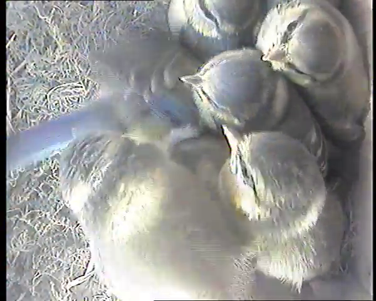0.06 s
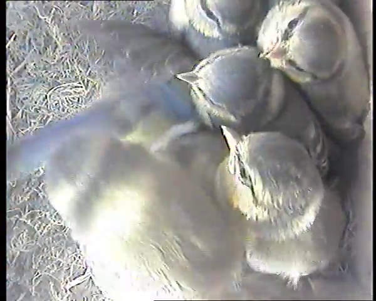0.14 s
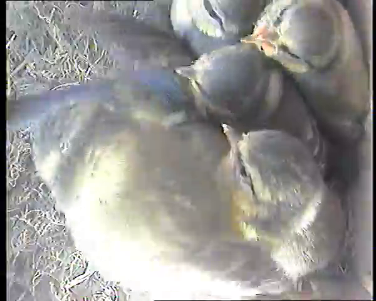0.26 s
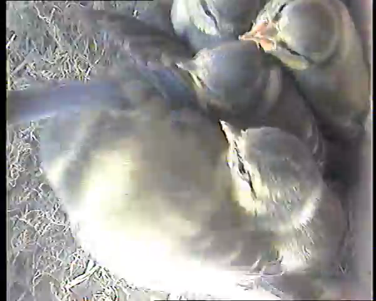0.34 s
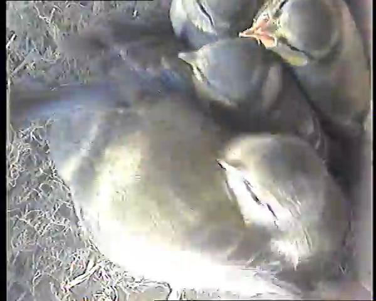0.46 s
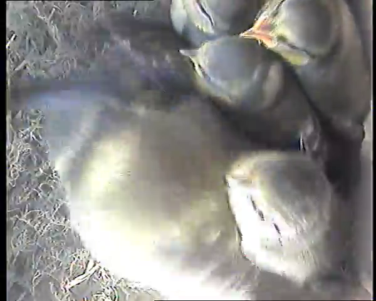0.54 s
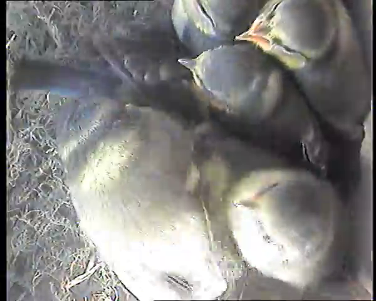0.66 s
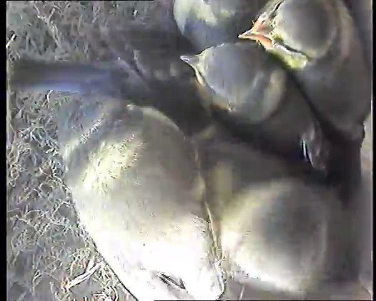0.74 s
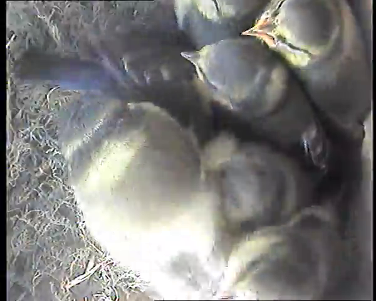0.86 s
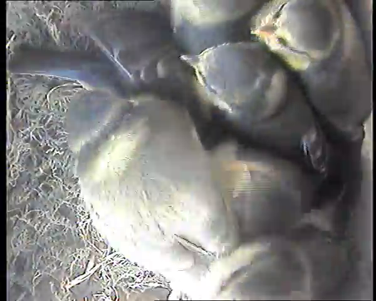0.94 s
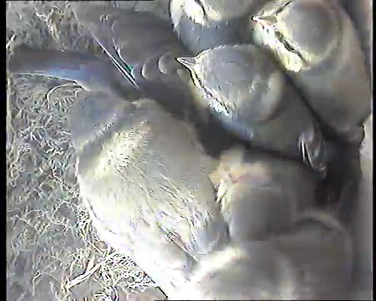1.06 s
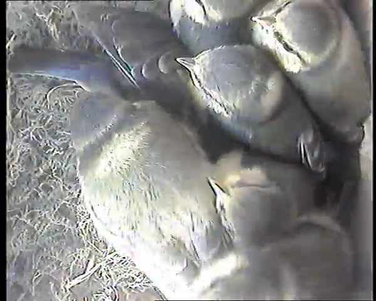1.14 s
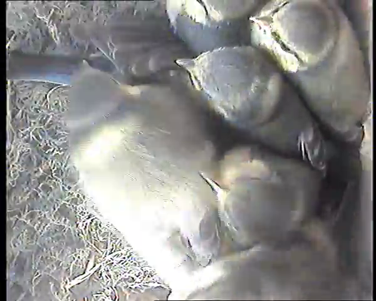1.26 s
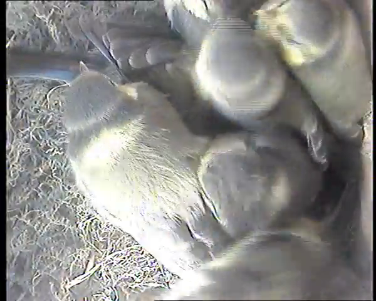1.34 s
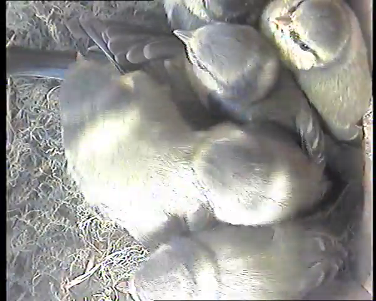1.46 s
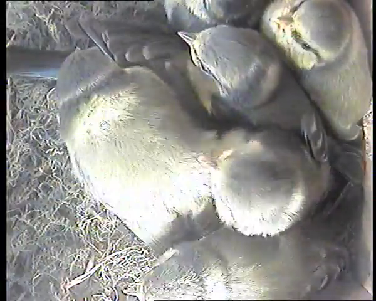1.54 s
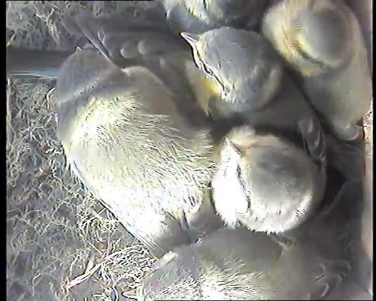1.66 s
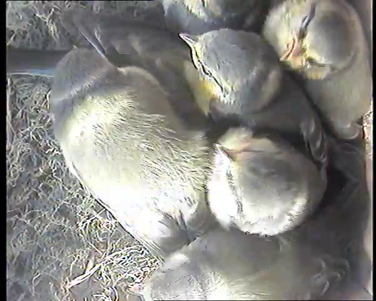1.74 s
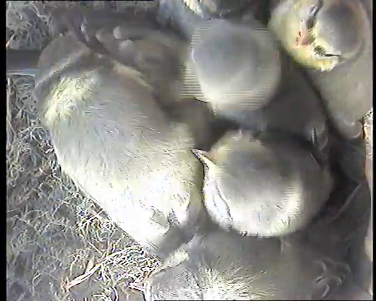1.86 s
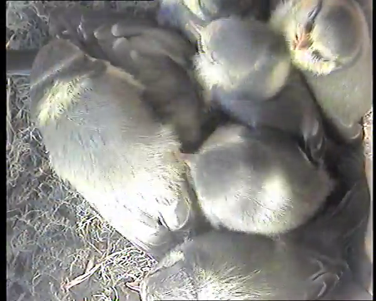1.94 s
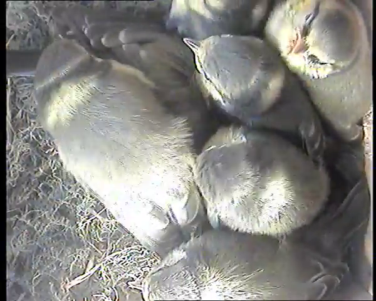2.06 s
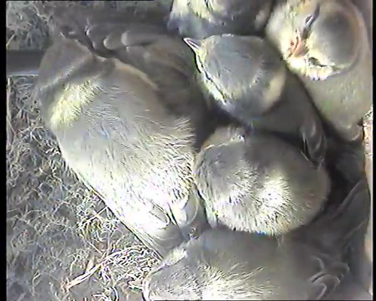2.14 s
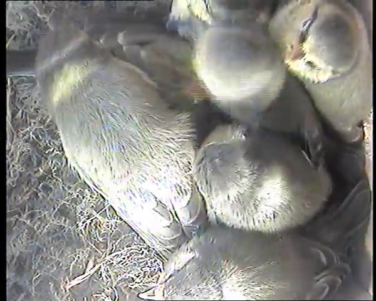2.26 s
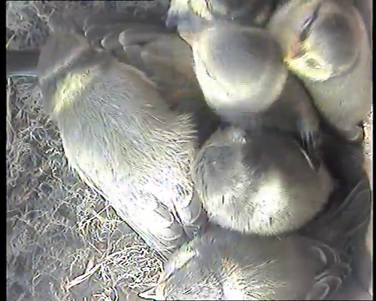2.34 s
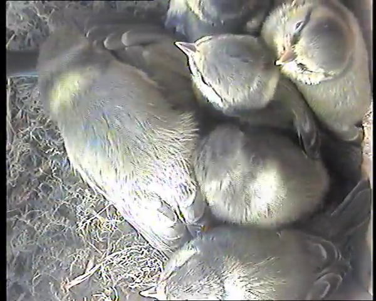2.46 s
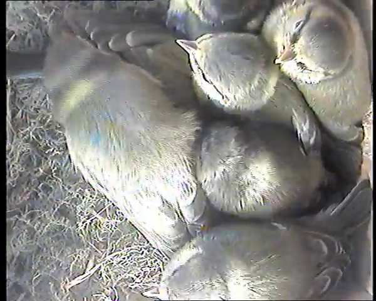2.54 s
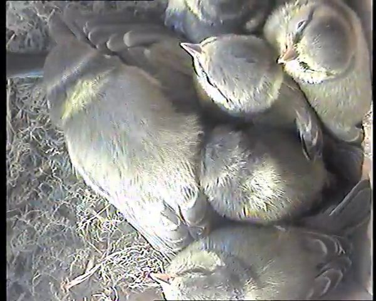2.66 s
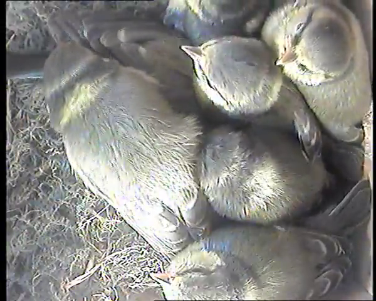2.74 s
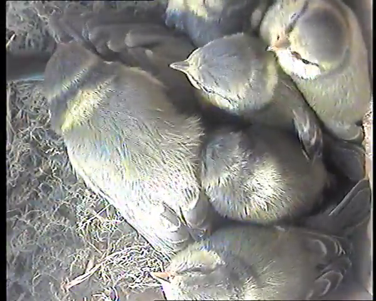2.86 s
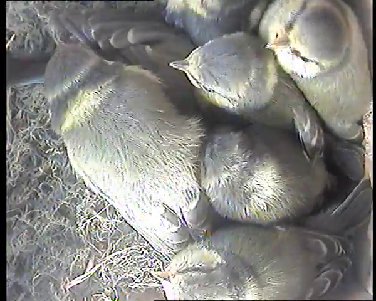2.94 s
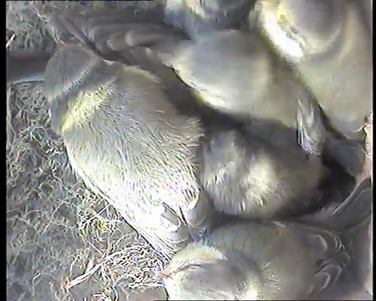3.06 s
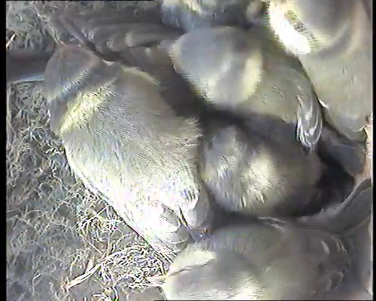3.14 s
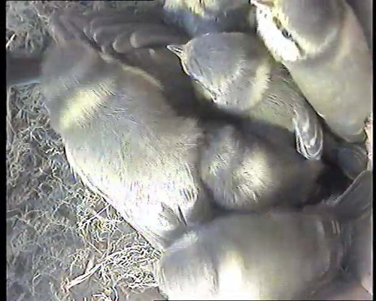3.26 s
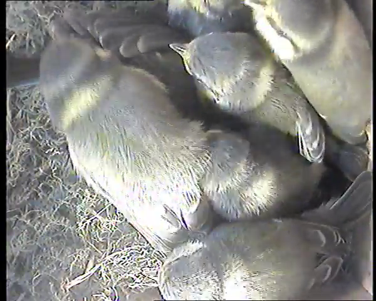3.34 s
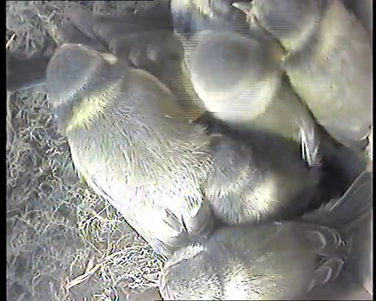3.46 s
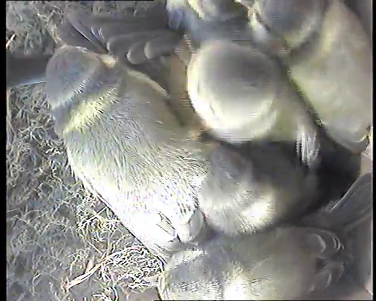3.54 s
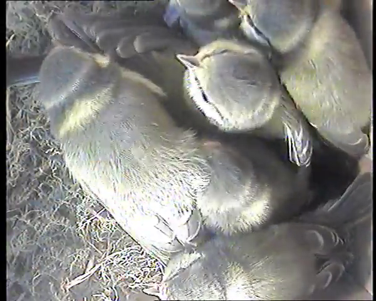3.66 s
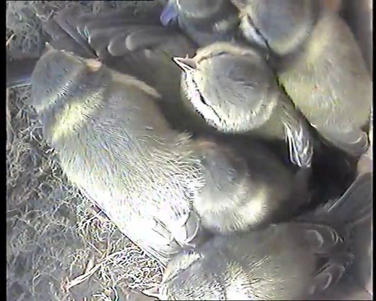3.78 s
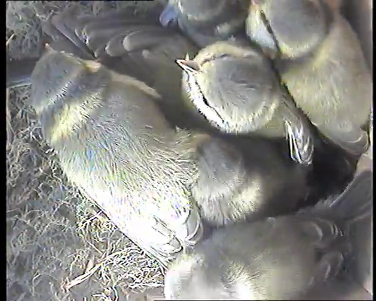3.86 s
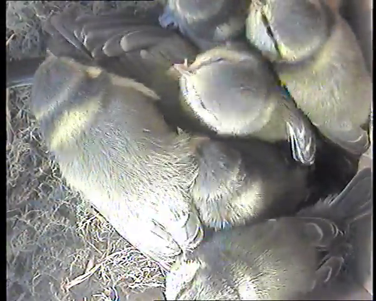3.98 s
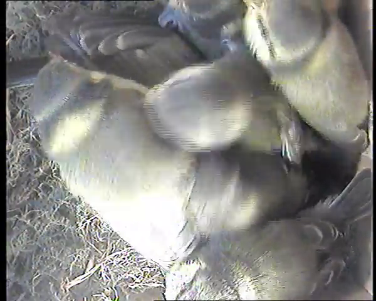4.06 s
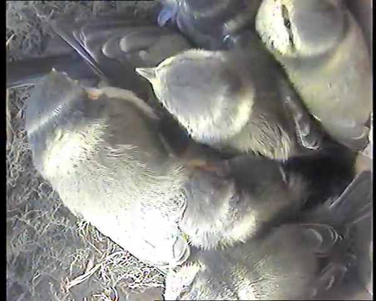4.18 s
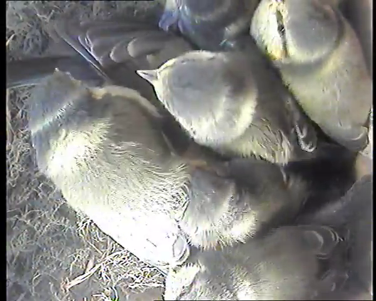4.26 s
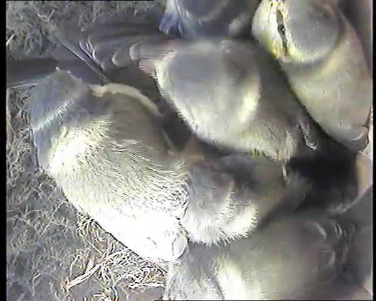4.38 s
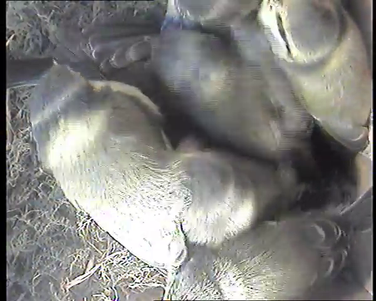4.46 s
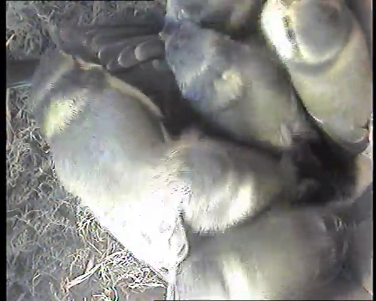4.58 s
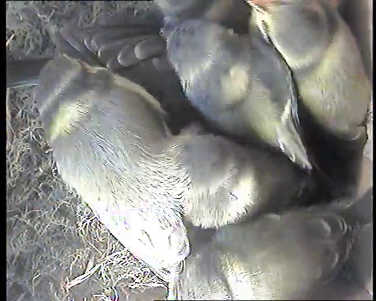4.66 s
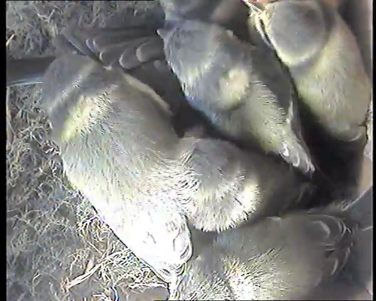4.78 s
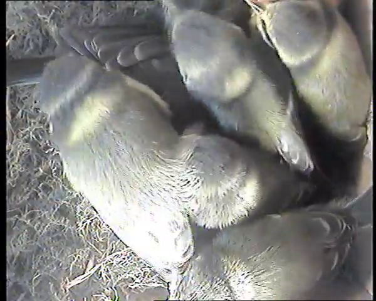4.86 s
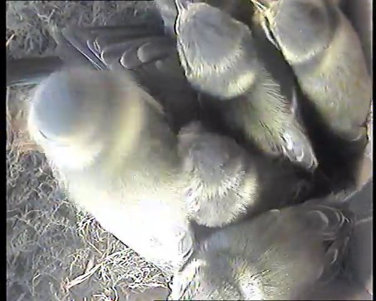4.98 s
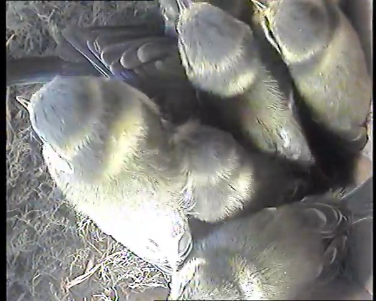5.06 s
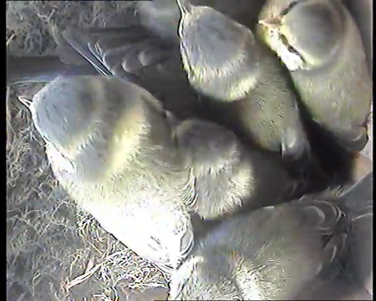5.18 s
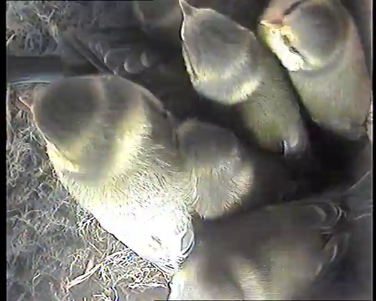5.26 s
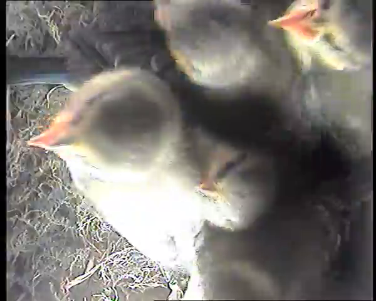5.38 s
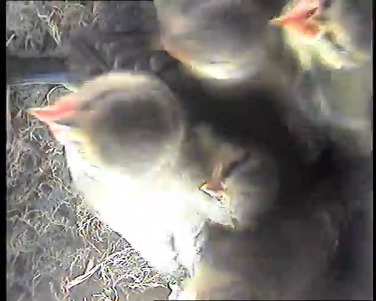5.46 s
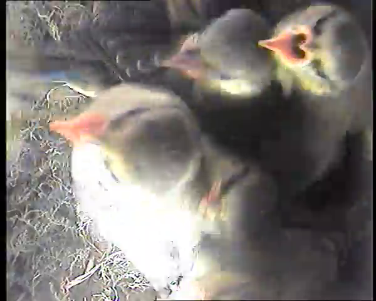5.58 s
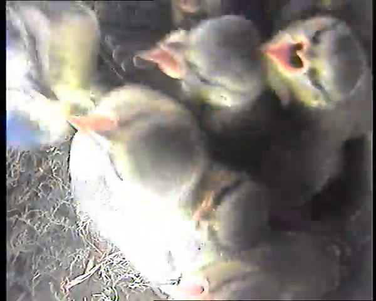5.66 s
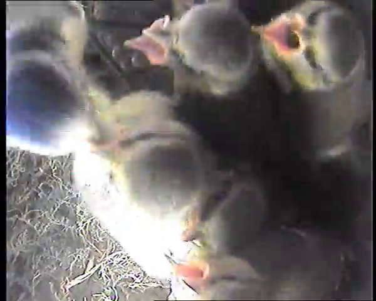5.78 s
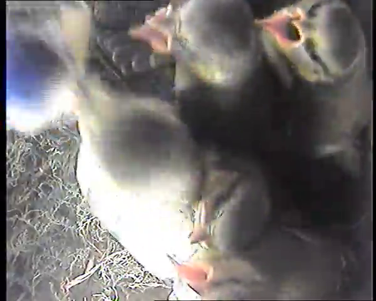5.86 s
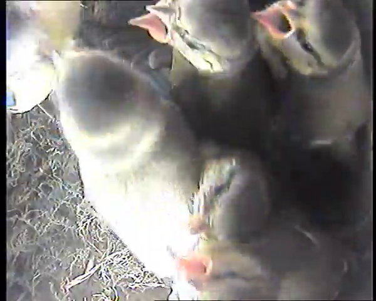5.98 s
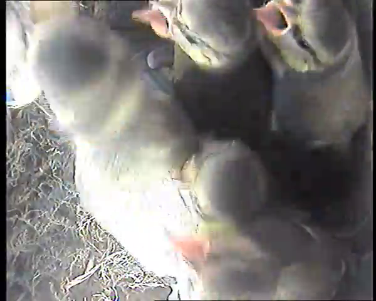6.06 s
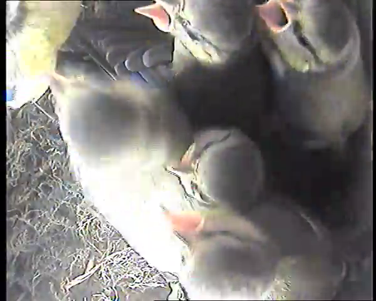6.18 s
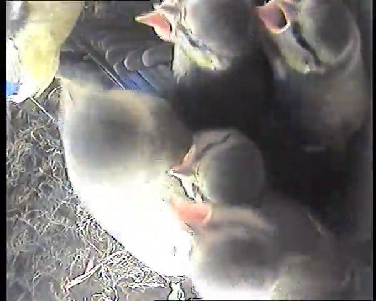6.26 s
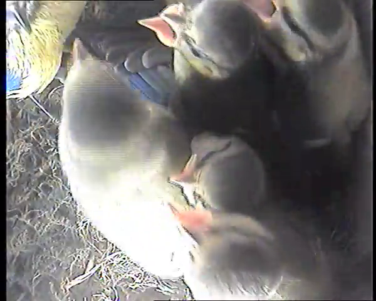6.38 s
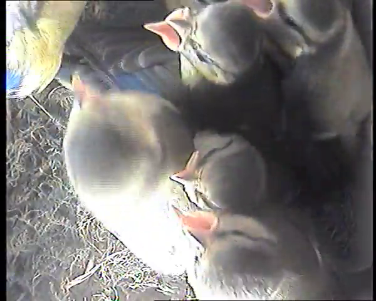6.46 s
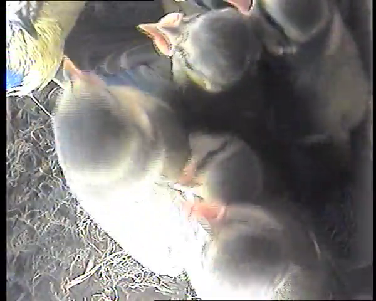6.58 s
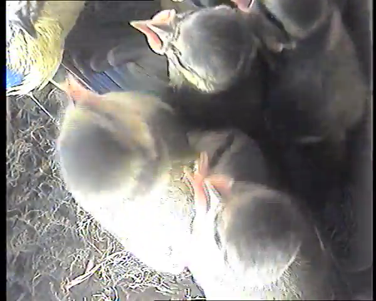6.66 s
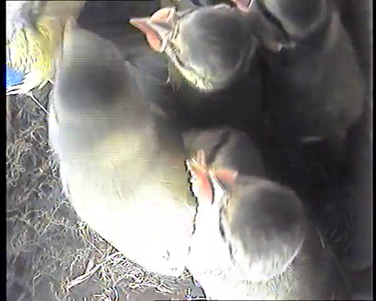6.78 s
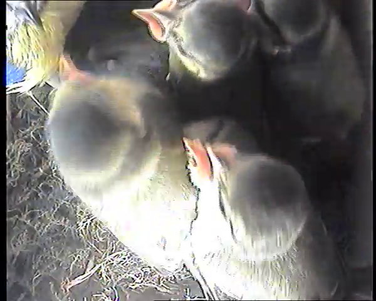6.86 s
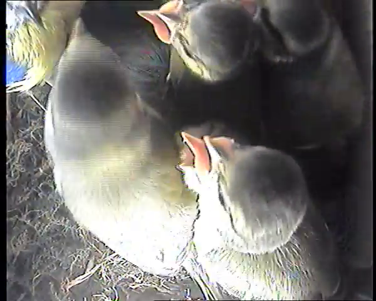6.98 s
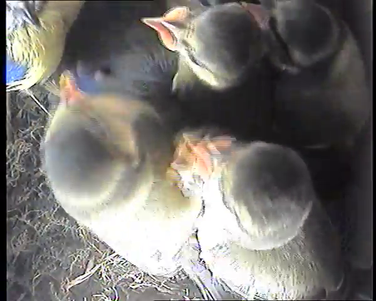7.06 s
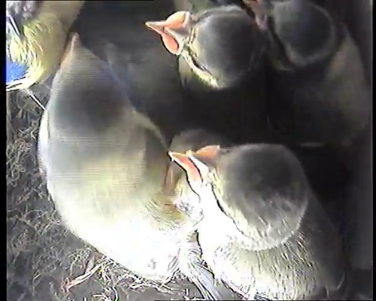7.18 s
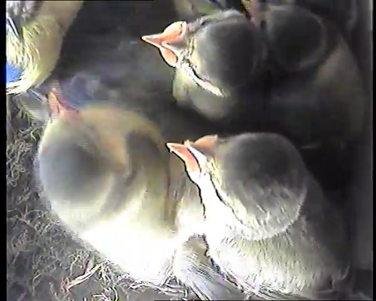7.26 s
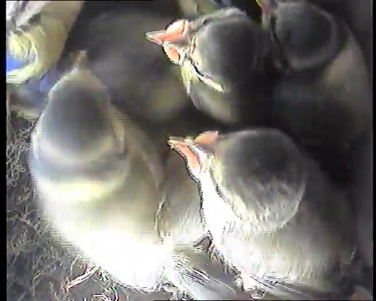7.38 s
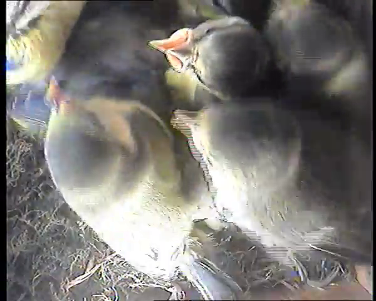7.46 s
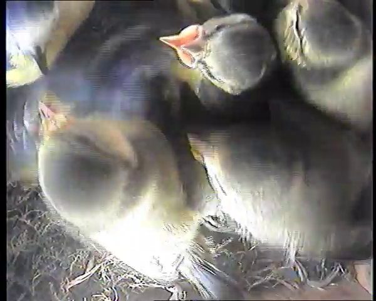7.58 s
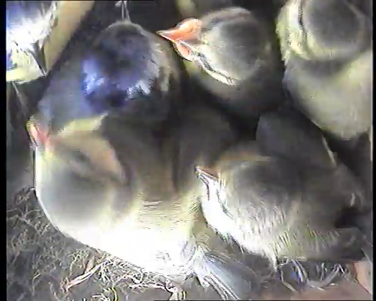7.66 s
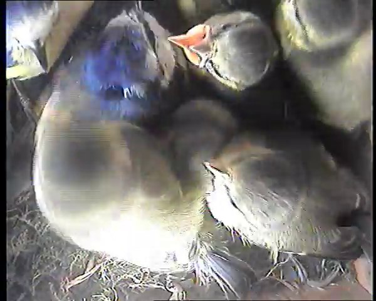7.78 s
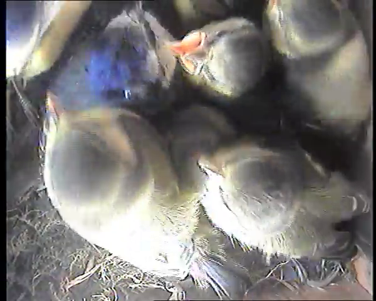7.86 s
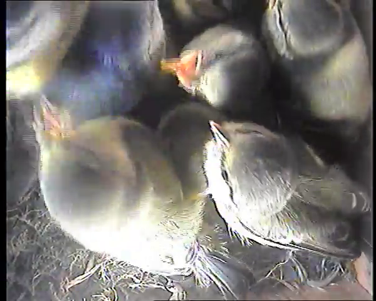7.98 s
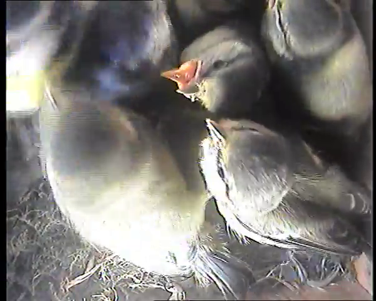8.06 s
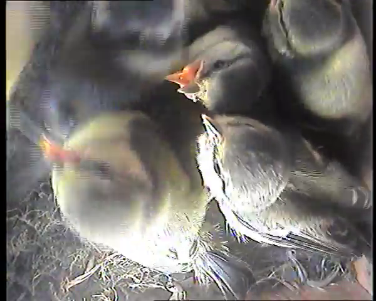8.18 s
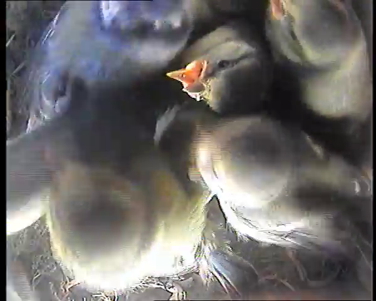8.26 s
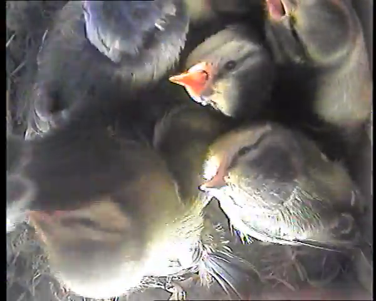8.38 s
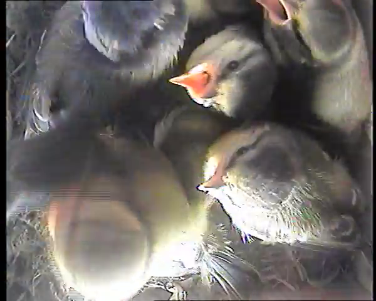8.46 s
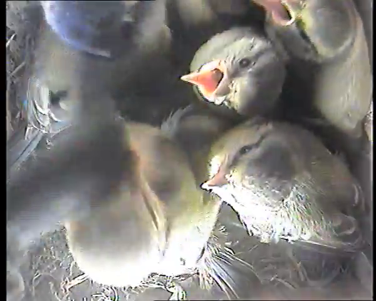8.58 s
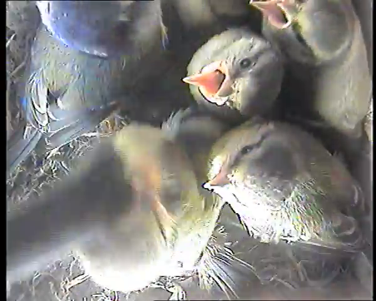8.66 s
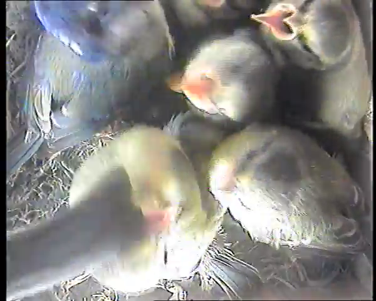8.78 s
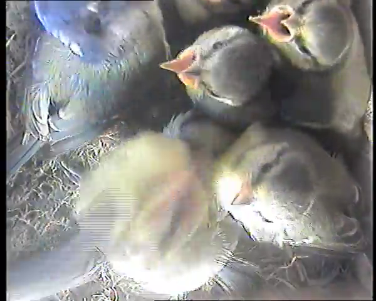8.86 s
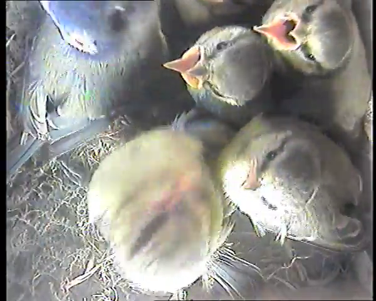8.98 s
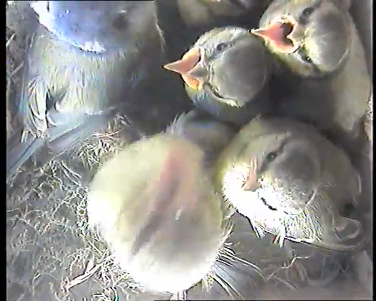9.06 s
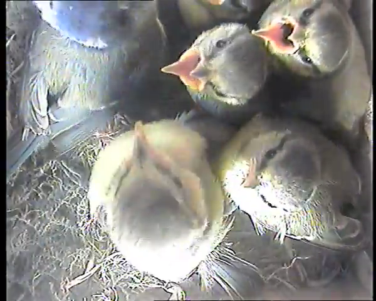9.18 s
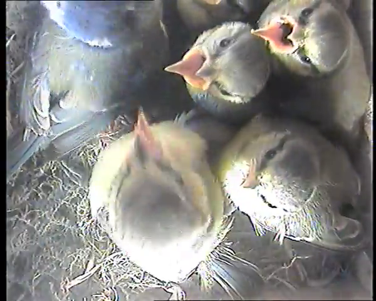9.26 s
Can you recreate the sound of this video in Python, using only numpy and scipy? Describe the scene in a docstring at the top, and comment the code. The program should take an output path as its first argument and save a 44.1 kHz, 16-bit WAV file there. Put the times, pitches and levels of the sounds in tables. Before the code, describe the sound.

Inside a small wooden nest box, several young birds beg in thin, fluttering buzzes with a few sharp squeals, then settle to soft rasps and peeps. Knocks on the wood build to a hard thump, and eager squeals burst out with scuffling. Whines, buzzes and more knocks follow. A close, cheap microphone adds low hum, hiss, a faint very high whistle and gritty overload.

```python
"""Nestlings beg in a wooden nest box, close to a small camera microphone, over low hum, hiss and line whistle.
After a thin peep come climbing buzzes and the first squeals; then calmer buzzes, hoarse rasps and whines.
Knocks on the wood build up, with a soft thud just before the hardest ones; eager, overloaded squeals burst out.
Whines and buzzes follow, then more knocks, scuffling and squeals, and last a few rasps.
Calls are bent, fluttering tones mixed with noise; knocks ring the box; hum and hiss are shaped noise."""
import sys
import numpy as np
from scipy import signal
from scipy.fft import rfft, irfft, next_fast_len
from scipy.io import wavfile

SR = 44100
rng = np.random.default_rng(int(sys.argv[2]) if len(sys.argv) > 2 else 0)


def materialize(psi):
    """Save the field psi as 16-bit PCM at rate SR to the path in sys.argv[1].

    A 1-D psi becomes a single channel; in a 2-D psi each row is a channel.
    """
    bounded = np.clip(np.atleast_2d(psi).T, -1, 1)
    quanta = np.round(bounded * 32767).astype(np.int16)
    wavfile.write(sys.argv[1], SR, quanta)


N = 411448

# buzzing calls that climb most of the way: (start t/s, end t/s, top register level/dB)
BUZZ_CALLS = [(0.187, 0.295, -51), (0.312, 0.368, -44), (0.389, 0.447, -42.5), (0.486, 0.531, -41),
              (0.619, 0.661, -44.5), (0.789, 0.871, -43), (1.689, 1.779, -45), (1.812, 1.87, -48),
              (1.9, 1.957, -45.5), (2.008, 2.061, -48), (2.141, 2.218, -50), (2.822, 2.886, -54),
              (2.916, 2.972, -50.5), (3.005, 3.074, -56), (3.154, 3.232, -51), (4.039, 4.098, -57),
              (4.152, 4.204, -56.5), (5.35, 5.42, -41.5), (5.501, 5.59, -38), (5.611, 5.715, -37.5),
              (5.917, 6.039, -38.5), (6.58, 6.648, -41.5), (6.675, 6.743, -42.5), (6.801, 6.881, -41.5),
              (6.973, 7.069, -44.5), (7.674, 7.732, -54.5), (7.761, 7.816, -52.5), (7.842, 7.899, -43),
              (7.935, 7.986, -42.5), (8.05, 8.125, -45.5), (8.402, 8.481, -45), (8.576, 8.65, -40),
              (8.682, 8.749, -40), (8.814, 8.899, -40.5)]
# hoarse calls that arch and droop: (start t/s, end t/s, top register level/dB)
RASP_CALLS = [(0.055, 0.127, -58.5), (1.381, 1.461, -58), (1.524, 1.574, -52.5), (2.088, 2.145, -55),
              (2.239, 2.309, -58), (3.274, 3.341, -54.5), (3.392, 3.465, -55), (3.921, 3.972, -61),
              (4.237, 4.344, -53), (4.344, 4.413, -56.5), (4.996, 5.038, -65), (5.404, 5.487, -43.5),
              (5.737, 5.881, -39), (6.124, 6.222, -50), (6.348, 6.494, -44.5), (6.499, 6.591, -42),
              (7.064, 7.121, -54.5), (7.155, 7.218, -53.5), (7.271, 7.353, -47.5), (7.407, 7.493, -44),
              (8.476, 8.568, -45), (8.951, 9.002, -65), (9.089, 9.15, -55), (9.24, 9.325, -46)]
# high, level whines with little body: (start t/s, end t/s, top register level/dB)
WHINE_CALLS = [(1.854, 1.936, -48.5), (2.048, 2.115, -50), (4.881, 4.942, -60.5), (6.295, 6.371, -46.5),
               (7.382, 7.454, -43.5), (7.488, 7.554, -45.5), (7.598, 7.674, -41)]
# squeals that shoot upward: (start t/s, end t/s, pitch aimed for f/Hz, level before overload level/dB)
SQUEAL_CALLS = [(.428, 0.442, 9200, -36.5), (0.512, 0.55, 8950, -28.5), (0.647, 0.691, 8970, -27.5),
                (2.041, 2.065, 8650, -35.5), (5.396, 5.411, 8800, -38), (5.466, 5.508, 9110, -29),
                (5.565, 5.637, 8850, -27.5), (5.647, 5.68, 8700, -40), (5.698, 5.759, 8590, -26),
                (5.763, 5.85, 8300, -34.5), (5.842, 5.888, 8530, -32.5), (6.713, 6.742, 8850, -29.5),
                (7.971, 7.985, 8530, -38.5), (8.728, 8.751, 8440, -38)]
# peeps and quick slurs, pitches before the bow: (start t/s, end t/s, first f/Hz, last f/Hz, level/dB)
PEEP_CALLS = [(0.013, 0.074, 5090, 4800, -48.5), (1.306, 1.356, 2850, 2700, -53.5),
              (1.457, 1.545, 2900, 2470, -47.5), (2.72, 2.787, 2800, 2580, -45.5),
              (2.971, 3.007, 2500, 2580, -46), (3.057, 3.096, 2700, 2300, -42.5),
              (3.9, 3.933, 7200, 7150, -54), (4.924, 4.98, 2850, 2670, -46),
              (5.059, 5.093, 2820, 2400, -45), (5.08, 5.116, 2350, 2740, -45),
              (5.873, 5.89, 9400, 7400, -37), (6.199, 6.258, 6150, 5450, -43.5),
              (7.476, 7.506, 3580, 6800, -39.5)]
# colour of a call inside the box, one table for each register: (f/Hz, relative level/dB)
LOW_REGISTER = [(560, 0.5), (740, -7.5), (930, 3), (1200, -0.5), (1470, 10), (1880, -12), (2160, -2.5),
                (2800, -19)]
MID_REGISTER = [(3400, -5.5), (3850, -13), (4400, -6.5), (5200, -3.5), (5600, 2), (6100, -14.5)]
TOP_REGISTER = [(6500, -1.5), (7350, 11.5), (8050, -1.5), (8600, 14.5), (9500, -2.5)]
# claws and beaks hitting the wood: (t/s, strength of the hit level/dB)
WOOD_KNOCKS = [(2.534, -34), (3.354, -35), (4.016, -35.5), (4.679, -30.5), (4.937, -24.5), (5.21, -21.5),
               (5.235, -14), (5.298, -24.5), (5.498, -22.5), (5.88, -27), (8.217, -20.5), (8.291, -25)]
# wings and feet scuffling: (start t/s, end t/s, peak of the swell level/dB)
SCUFFLE_BOUTS = [(5.222, 5.32, -36), (5.445, 5.646, -35.5), (8.197, 8.354, -35), (8.894, 8.95, -33.5)]
# colour of claws scratching the lining: (f/Hz, relative level/dB)
SCRATCH_COLOUR = [(450, 2.5), (1600, 1)]
# notes at which the struck box rings: (f/Hz, level/dB, time to fade by 60 dB t/s)
BOX_MODES = [(181.5, -8.5, 0.074), (338, -4, 0.033), (502, -3.5, 0.028), (605.5, -4.5, 0.081),
             (875, -9, 0.04), (1050, -13, 0.041), (1360, -5, 0.0051)]
# a soft jolt through the box just before the hardest knocks: (start t/s, end t/s, level/dB)
BOX_THUD = (5.14, 5.25, -37)
# colour of the steady hum and hiss: (f/Hz, relative level/dB)
HUM_COLOUR = [(20, -8.5), (60, -8.5), (125, -6), (165, 1), (215, 1), (319, -15.5), (560, -21), (753, -29),
              (850, -21), (1420, -21.5), (1930, -35.5), (15000, -37)]

# base pitch of the softest and hardest fluttering call, before its kind's pitch share and scatter
SOFT_HZ, HARD_HZ = 2298, 2826
# top register level at full effort, and how far below it effort reaches zero
HARD_DB, EFFORT_RANGE_DB = -40, 27
MID_FOLLOWS = 0.31  # share of the top register's level changes that the middle one follows
FLUTTER_BEND_RAD = .55  # phase bend by the flutter in the lowest strand; higher strands bend more
PULSING_DB = 1.4  # unevenness of the pulsing
HOOK = 0.14  # share of the base pitch that the softest call drops at its very end
# a call ending this near a squeal's start whips upward by this share of its base pitch
WHIP, WHIP_REACH_S = 0.5, .03
SQUEAL_SAG_PER_S = 1.8  # share of pitch the upper voice loses by its end, per second of length
SQUEAL_COLLAPSE = 0.76  # the share lost when a squeal follows another without a pause
# a peep's octave and breathy husk; the octave is left out if it would start above the top frequency
PEEP_OCTAVE_DB, PEEP_HUSK_DB, PEEP_TOP_HZ = -4, -6, 7000
HUM_DB, LINE_DB, LINE_HZ = -41, -53.5, 15624.5
CUTOFF_HZ = 15900


def from_db(db):
    """Turn decibels into gain."""
    return 10 ** (np.asarray(db) / 20)


def rms_one(x):
    """Scale to an average strength (rms) of 1."""
    return x / np.sqrt(np.mean(x ** 2) + 1e-20)


def add(out, start, sound):
    """Mix a sound in at a time in seconds."""
    i = round(start * SR)
    out[i:i + len(sound)] += sound[:N - i]


def clock(start, end):
    """Seconds into a sound, and its progress from 0 to 1."""
    t = np.arange(max(round((end - start) * SR), 20)) / SR
    return t, t / t[-1]


def swell(u, rise, fall):
    """Smooth rise and fall, each over a share of the sound."""
    fade_in = np.sin(np.pi / 2 * np.clip(u / rise, 0, 1))
    fade_out = np.sin(np.pi / 2 * np.clip((1 - u) / fall, 0, 1))
    return fade_in * fade_out


def coloured(x, points):
    """Shape by a spectrum that falls away steeply past its ends; rms 1."""
    hz, db = np.transpose(points)
    n = next_fast_len(len(x))
    f = np.maximum(np.arange(n // 2 + 1) * SR / n, 1)
    skirts = (np.minimum(f / hz[0], 1) * np.minimum(hz[-1] / f, 1)) ** 6
    gain = from_db(np.interp(np.log(f), np.log(hz), db))
    return rms_one(irfft(rfft(x, n) * skirts * gain, n)[:len(x)])


def white(n):
    """A fresh stretch of plain noise."""
    return rng.standard_normal(n)


def wander(n, hz):
    """Random wavering, mostly slower than the given rate; rms 1."""
    b, a = signal.butter(2, hz, fs=SR)
    return rms_one(signal.lfilter(b, a, white(n)))


def phase_of(hz):
    """Running phase of a moving frequency."""
    return 2 * np.pi * np.cumsum(hz) / SR


def chorus(call, rows, **voice):
    """Place all calls of one kind."""
    out = np.zeros(N)
    for row in rows:
        add(out, row[0], call(*row, **voice))
    return out


def fluttering_call(start, end, top_db, low_db, mid_db, pitch_share, climb, droop, crest, hoarse,
                    flutter_ratio=.23, flutter_depth=0.96, jitter=0.0456, scatter=.03,
                    line_db=-9, low_tone=0.4):
    """A whistle climbs and droops; fast flutter splits it into strands, roughness adds noise, effort lifts it."""
    t, u = clock(start, end)
    n = len(t)
    effort = np.clip(1 + (top_db - HARD_DB) / EFFORT_RANGE_DB, 0, 1)

    crest = np.clip(crest * rng.uniform(.8, 1.2), .1, .9)
    below_crest = climb * rng.uniform(.5, 1.5) * np.maximum(1 - u / crest, 0) ** 1.5
    past_crest = droop * (np.maximum(u - crest, 0) / (1 - crest)) ** 2
    arch = 1 - below_crest - past_crest
    meets_squeal = any(abs(row[0] - end) < WHIP_REACH_S for row in SQUEAL_CALLS)
    ending = WHIP * u ** 5 if meets_squeal else -HOOK * (1 - effort) * u ** 10
    pitch = pitch_share * (SOFT_HZ + (HARD_HZ - SOFT_HZ) * effort ** 2)
    pitch = pitch * (1 + scatter * rng.standard_normal())

    # the voice clears as the call swells
    rough = 1 - np.clip(1 - hoarse, 0, 1) * swell(u, 0.48, 0.11)
    voice = phase_of(pitch * (arch + ending) * (1 + jitter * rough * wander(n, 504)))
    flutter = flutter_ratio * rng.uniform(.85, 1.15) * voice + 2 * rough * wander(n, 200)
    beat = (1 + flutter_depth * np.cos(flutter)) * from_db(PULSING_DB * wander(n, 99))

    # each harmonic fills one register: (colour, level/dB, weight of the tone, rise share, fall share)
    registers = [
        (LOW_REGISTER, low_db + max(top_db - HARD_DB, 0), low_tone, .3, .2),
        (MID_REGISTER, mid_db + MID_FOLLOWS * (top_db - HARD_DB), 1, .5, .4),
        (TOP_REGISTER, top_db, 1, .62, .34)]
    call = 0
    for k, (colour, level_db, tone, rise, fall) in enumerate(registers, 1):
        bend = FLUTTER_BEND_RAD * np.sqrt(k) * np.sin(flutter + rng.uniform(0, 2 * np.pi))
        strands = coloured(beat * np.sin(k * voice + bend), colour)
        noise = coloured(beat * white(n), colour)
        clear = tone * (1.5 - rough)
        mix = (clear * strands + rough * noise) / np.hypot(clear, rough)
        call = call + from_db(level_db) * rms_one(mix * swell(u, rise, fall))

    # the bare lowest tone rises first, fades last and stands out most in soft calls
    line = (1 - effort) * (0.4 + 2 * u ** 4) * swell(u, 0.033, .05) * beat
    return call + from_db(low_db + line_db) * np.sqrt(2) * line * np.sin(voice)


def buzzes_rasps_and_whines():
    """The three fluttering calls differ in body, pitch contour and hoarseness."""
    buzzes = chorus(fluttering_call, BUZZ_CALLS, low_db=-35.5, mid_db=-37.5, pitch_share=.96,
                    climb=.24, droop=0.055, crest=.75, hoarse=0.5)
    rasps = chorus(fluttering_call, RASP_CALLS, low_db=-36.5, mid_db=-41.5, pitch_share=1,
                   climb=.12, droop=.2, crest=.6, hoarse=0.69)
    whines = chorus(fluttering_call, WHINE_CALLS, low_db=-41, mid_db=-40, pitch_share=1.07,
                    climb=0.0633, droop=0.088, crest=0.453, hoarse=0.26)
    return buzzes + rasps + whines


def squeal(start, end, top_hz, fall, db, sweep_s=.0105, sweep_depth=0.56, second_voice=.85,
           second_sag=0.293, sideband_db=-26, flare=0.98, flare_s=0.0205):
    """A whistle sweeps up and forks: one side of the syrinx (voice organ) stays lower, the other arches above."""
    t, u = clock(start, end)
    sweep = 1 - sweep_depth * np.exp(-(t / sweep_s) ** 2)
    upper = top_hz * sweep * (1 - fall * u ** 3)
    held = top_hz * second_voice * (1 - second_sag * fall * u ** 2 - 0.1016 * np.exp(-t / sweep_s))
    forked = np.clip((upper / held - 1) * 10 + .5, 0, 1)
    voices, phases = 0, []
    for hz, share in ((upper, 1), (np.minimum(held, upper), forked)):
        phase = phase_of(hz * (1 + .003 * wander(len(t), 500)))
        phases.append(phase)
        box_gain = from_db(.5 * np.interp(hz, *np.transpose(TOP_REGISTER)))
        voices = voices + share * np.sin(phase) * box_gain
    # the two sides shake each other, which adds extra tones beside them
    shake = 2 * from_db(sideband_db) * forked * np.cos(phases[0] - phases[1])
    push = swell(u, .15, .35) * (1 + flare * np.exp(-((t - flare_s) / .003) ** 2))
    return from_db(db) * rms_one(voices * (1 + shake) * push)


def squeals():
    """Longer squeals sag further in pitch; one that follows another without a pause collapses."""
    rows, last_end = [], 0
    for start, end, hz, db in SQUEAL_CALLS:
        rested = start - last_end > .003
        fall = SQUEAL_SAG_PER_S * (end - start) if rested else SQUEAL_COLLAPSE
        rows.append((start, end, hz, fall, db))
        last_end = end
    return chorus(squeal, rows)


def overloaded(x, bend=5.47, corner_hz=3500, overtone_db=-27, bass_hz=40):
    """The microphone bends loud squeals unevenly, adding a difference tone, a soft thump and faint overtones."""
    rectified = np.abs(x) ** 1.5
    low_pass = signal.butter(2, corner_hz, fs=SR, output="sos")
    high_pass = signal.butter(1, bass_hz, "high", fs=SR, output="sos")
    bent = signal.sosfilt(low_pass, rectified) - from_db(overtone_db) * rectified
    return x + bend * signal.sosfilt(high_pass, bent)


def peep(start, end, first_hz, last_hz, db, bow=0.039, waver=0.013, break_db=3):
    """A thin, husky whistle slides along a slight bow with uneven loudness; high peeps have no octave."""
    t, u = clock(start, end)
    n = len(t)
    slide = (first_hz + (last_hz - first_hz) * u) * (1 - bow * (2 * u - 1) ** 2)
    voice = phase_of(slide * (1 + waver * (2 * wander(n, 600) + wander(n, 52))))
    has_octave = 2 * first_hz < PEEP_TOP_HZ
    tone = np.sin(voice) + from_db(PEEP_OCTAVE_DB) * has_octave * np.sin(2 * voice)
    husk = from_db(PEEP_HUSK_DB) * coloured(white(n), LOW_REGISTER)
    breaking = from_db(break_db * wander(n, 100))
    return from_db(db) * rms_one((tone + husk) * breaking * swell(u, 0.37, 0.29))


def wood(force):
    """A force makes the box ring at its own notes, each dying away at its own speed."""
    out = 0
    for k, (hz, db, t60) in enumerate(BOX_MODES):
        r = from_db(-60 / (t60 * SR))  # decay per sample
        w = 2 * np.pi * hz / SR
        ring = signal.lfilter([0, np.sin(w)], [1, -2 * r * np.cos(w), r * r], force + 1e-18)
        out = out + (-1) ** k * from_db(db) * ring
    return out


def grains(per_s, spread_db):
    """Random tiny contacts of uneven size."""
    hits = rng.random(N) < per_s / SR
    size = from_db(spread_db * np.minimum(rng.exponential(1, N), 4))
    return hits * rng.choice([-1, 1], N) * size


def knocks(scrape=0.095, scrape_s=0.0066):
    """Each knock is one sharp hit and a short noisy scrape that ring the box."""
    force = np.zeros(N)
    t = np.arange(SR // 20) / SR
    for s, db in WOOD_KNOCKS:
        hit = (t == 0) + scrape * white(len(t)) * np.exp(-t / scrape_s)
        add(force, s, from_db(db) * hit)
    return wood(force)


def scuffling(rumble_db=-7):
    """Bouts of many tiny scratches ring the wood, brush the lining and make the hollow box rumble."""
    bouts = np.zeros(N)
    for start, end, db in SCUFFLE_BOUTS:
        add(bouts, start, from_db(db) * swell(clock(start, end)[1], 0.14, 0.43))
    scratches = grains(per_s=880, spread_db=2.0)
    contact = rms_one(rms_one(wood(scratches)) + coloured(scratches, SCRATCH_COLOUR))
    return bouts * (contact + from_db(rumble_db) * wander(N, 320))


def thud(start, end, db):
    """The whole box is jolted: a brief swell of low, rumbling noise."""
    out = np.zeros(N)
    add(out, start, from_db(db) * swell(clock(start, end)[1], 0.57, .5))
    return out * wander(N, 130)


def stirring(straw_db=-51):
    """The nest lining stirs all the time: sparse tiny contacts ring the wood."""
    return from_db(straw_db) * rms_one(wood(grains(per_s=150, spread_db=5.5)))


def background():
    """Low hum of the hollow box with hiss, both shaped noise, and the camera's line whistle, a steady sine."""
    hum = from_db(HUM_DB) * coloured(white(N), HUM_COLOUR)
    whistle = np.sqrt(2) * np.sin(2 * np.pi * LINE_HZ * np.arange(N) / SR)
    return hum + from_db(LINE_DB) * whistle


def scene():
    """The brood, its movements and the background on one microphone."""
    calls = buzzes_rasps_and_whines() + overloaded(squeals()) + chorus(peep, PEEP_CALLS)
    movement = knocks() + scuffling() + thud(*BOX_THUD) + stirring()
    return (calls + movement + background())[None]


def record(dry):
    """Peaks are rounded and the top is cut steeply."""
    rounded = .5 * np.tanh(2 * dry)
    return signal.sosfilt(signal.ellip(12, .1, 80, CUTOFF_HZ, fs=SR, output="sos"), rounded)


dry = scene()
out = record(dry)
materialize(out)
```